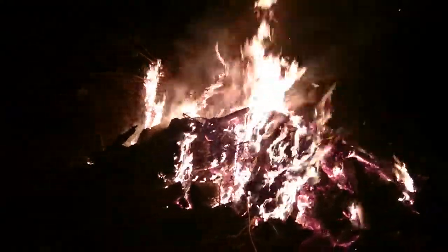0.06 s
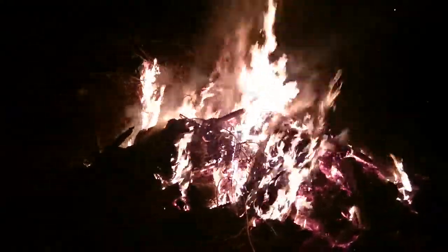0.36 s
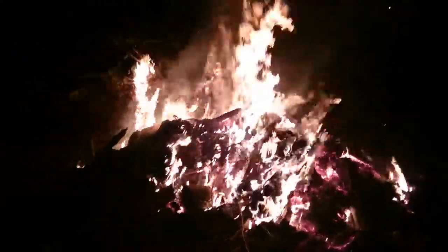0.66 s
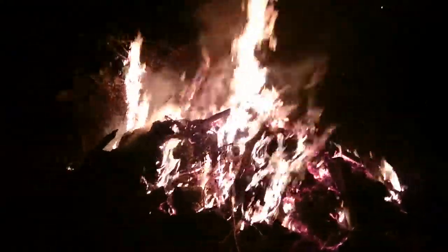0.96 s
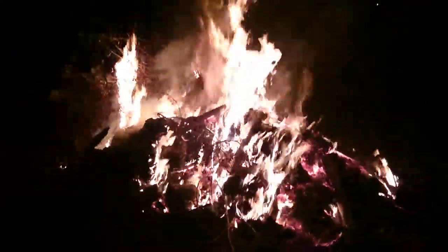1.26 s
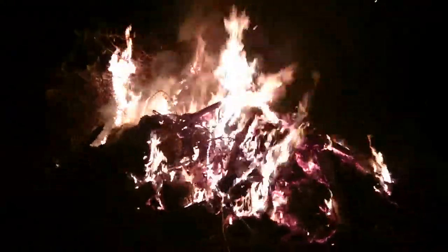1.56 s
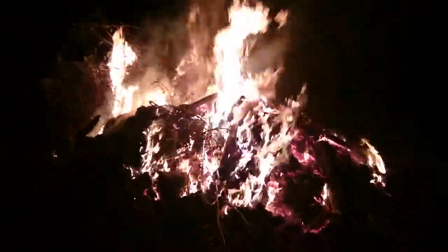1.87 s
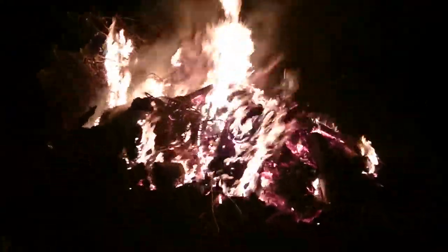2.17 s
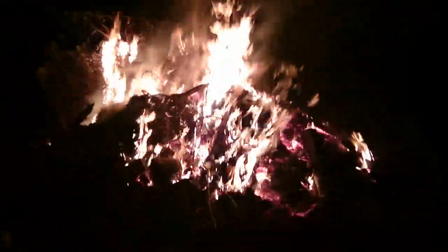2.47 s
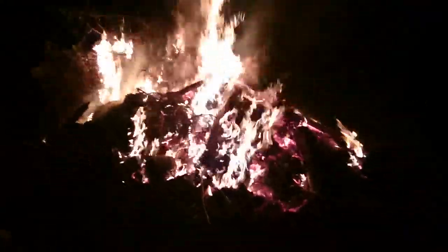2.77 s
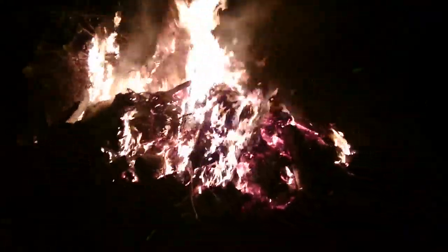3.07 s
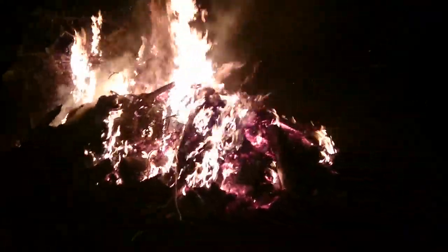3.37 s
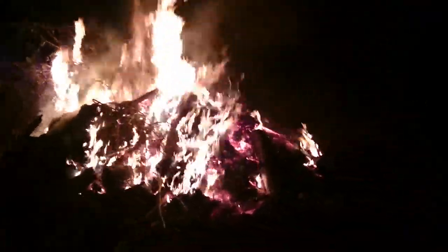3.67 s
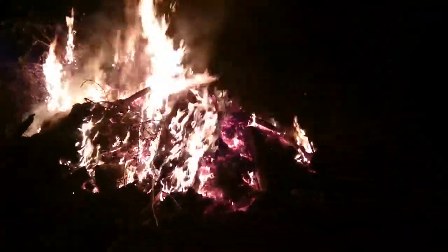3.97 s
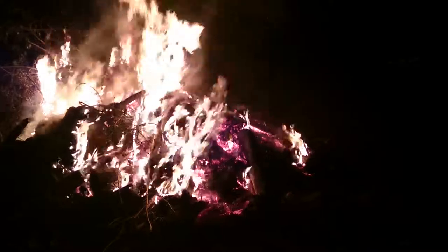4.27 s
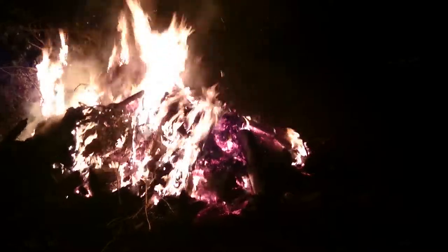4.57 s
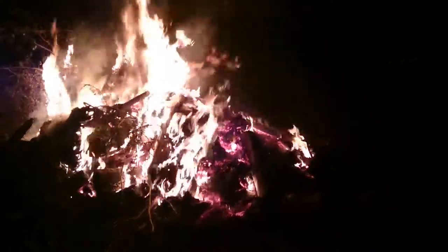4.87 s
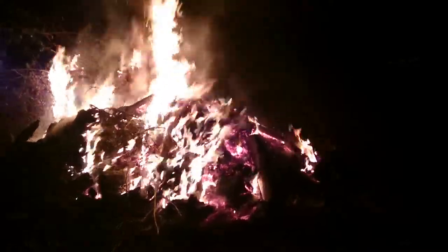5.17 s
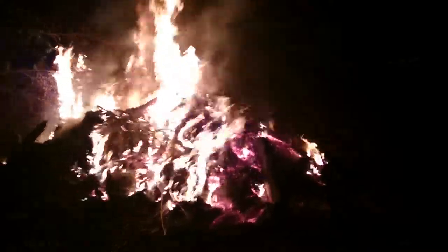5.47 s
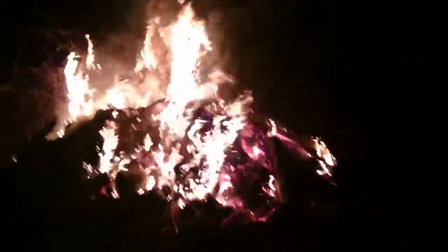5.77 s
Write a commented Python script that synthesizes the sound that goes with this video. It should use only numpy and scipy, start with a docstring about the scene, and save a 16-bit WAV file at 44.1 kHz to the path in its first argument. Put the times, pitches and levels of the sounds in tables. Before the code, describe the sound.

A large outdoor bonfire sizzles and crackles densely with sharp wood pops, over a soft flame roar and a distant engine hum.

```python
"""Sizzling and dense crackle from a large bonfire in the open, a few metres from a phone.
Sap boils, turbulent flames roar and puff, and an engine hums some way off beside a low drone.
Steam pockets burst in the wood: loud pops over countless small ones, each scattered by the pile.
Some pops, loud or faint, come with a short ring or hollow knock; steam hisses out of cracks."""
import sys
import numpy as np
from scipy import signal
from scipy.fft import rfft, irfft, next_fast_len
from scipy.io import wavfile

SR = 44100
rng = np.random.default_rng(int(sys.argv[2]) if len(sys.argv) > 2 else 0)


def transcribe(u):
    """Save the signal u as a 16-bit wav file named by the first command-line argument.

    u: samples, shape (n,) or (channels, n), limited to [-1, 1]; the rate is SR.
    q: integer samples, one column per channel.
    """
    v = np.clip(np.atleast_2d(u).T, -1, 1)
    q = np.round(v * 32767).astype(np.int16)
    wavfile.write(sys.argv[1], SR, q)


N = 256662
T = np.arange(N) / SR


def undb(db):
    """Decibels to gain."""
    return 10 ** (np.asarray(db) / 20)


def unit(x):
    """Scale to rms 1."""
    return x / np.sqrt(np.mean(x ** 2, axis=-1, keepdims=True))


def curve(table, column):
    """One table column, interpolated linearly in time."""
    rows = np.array(table)
    return np.interp(T, rows[:, 0], rows[:, column])


def bell(peak_s, sigma_s):
    """Gaussian rise and fall, peak 1."""
    return np.exp(-((T - peak_s) / sigma_s) ** 2 / 2)


def colour(spectrum, hz):
    """Gain at hz of a (freq_hz, gain_db) table."""
    rows = np.array(spectrum)
    return undb(np.interp(np.log(hz + 1), np.log(rows[:, 0]), rows[:, 1]))


def hump(hz, centre_hz, width_oct):
    """Gain of a resonance, symmetric in octaves."""
    return (1 + (np.log2((hz + 1) / centre_hz) / width_oct) ** 2 / 2) ** -1.5


def noise(gain_at):
    """Noise of rms 1 with the spectrum gain_at(hz)."""
    size = next_fast_len(N, real=True)
    white = rfft(rng.standard_normal(size))
    return unit(irfft(white * gain_at(np.fft.rfftfreq(size, 1 / SR)), size)[:N])


def band(centre_hz, width_oct):
    """Resonant noise of rms 1."""
    return noise(lambda hz: hump(hz, centre_hz, width_oct))


def walk(rate_hz):
    """Smooth random drift of rms 1."""
    return noise(lambda hz: np.exp(-(hz / rate_hz) ** 2))


def swells(rows, width_oct):
    """Noise bands that rise and die away."""
    return sum(band(centre_hz, width_oct) * undb(level_db) * bell(peak_s, sigma_s)
               for peak_s, level_db, centre_hz, sigma_s in rows)


def causal(gain):
    """Minimum-phase responses of the given gains: all ringing follows the blow."""
    cepstrum = irfft(np.log(gain))
    half = cepstrum.shape[-1] // 2
    cepstrum[:, 1:half] *= 2
    cepstrum[:, half + 1:] = 0
    return np.exp(rfft(cepstrum))


# burn intensity, drives sap and crackle: time_s, fine_db, coarse_db
BURN_LEVELS = [(0.05, -43, -49.5), (0.43, -45.5, -50.5), (0.81, -42.5, -50), (2.37, -45, -52),
               (2.54, -46, -54), (2.92, -46.5, -53.5), (3.29, -46, -55.5), (3.7, -43.5, -51.5),
               (3.84, -47, -53), (5.02, -46, -54), (5.41, -48.5, -55), (5.75, -46.5, -53.5)]
# fine sizzle: freq_hz, gain_db
SIZZLE_SPECTRUM = [(2000, -9.5), (4000, -8), (5100, 2.8), (6000, 3.2), (6900, 0.3), (8200, -0.3),
                   (9600, 4.7), (10300, -1), (13000, -4.8), (15500, -10.5)]
# coarse sputter: freq_hz, gain_db
SPUTTER_SPECTRUM = [(500, -15.5), (1000, -6.5), (1350, -5.5), (1950, 2), (2400, 1), (3200, 3.5),
                    (4200, 2.5), (7000, -26.5)]
SIZZLE_DB, SIZZLE_DB_PER_BURN_DB = -50.4, 0.55


def sap(fine_db, coarse_db):
    """Sap boils in quick fits: a fine sizzle, and a lower sputter from thick logs."""
    shared_fits = walk(80)
    fine_fits_db = 1.6 * shared_fits + 1.3 * walk(20)
    coarse_fits_db = 1.1 * shared_fits + 1.3 * walk(70)
    sizzle_db = SIZZLE_DB + SIZZLE_DB_PER_BURN_DB * (fine_db - fine_db.mean())
    sizzle = noise(lambda hz: colour(SIZZLE_SPECTRUM, hz)) * undb(sizzle_db + fine_fits_db)
    sputter = noise(lambda hz: colour(SPUTTER_SPECTRUM, hz)) * undb(coarse_db + 0.72 + coarse_fits_db)
    return sizzle + sputter


# cracking wood: freq_hz, gain_db
WOOD_SPECTRUM = [(600, -0.5), (1000, -4), (2200, 3), (3000, 3.5), (4100, 1.5), (5200, 6.5), (7200, -1.7),
                 (9400, 6.5), (11000, -.7), (15000, -3.7)]


def bursts(rows, snap_s, tail_s, scatter_s, size=1024):
    """Each burst: a snap of tearing fibres, then a tail scattered by logs and ground."""
    start_s, level_db, pitch_hz, width_oct, tail_db = np.array(rows, float).T[:, :, None]
    t, hz = np.arange(size) / SR, np.fft.rfftfreq(size, 1 / SR)
    wood = causal(hump(hz, pitch_hz, width_oct) * colour(WOOD_SPECTRUM, hz))
    white = rng.standard_normal((len(rows), 2, size))
    snap = white[:, 0] * t * np.exp(-t / snap_s)
    build_up = 1 - np.exp(-(t / scatter_s) ** 2)
    tail = white[:, 1] * np.exp(-t / tail_s) * build_up
    snap, tail = (unit(irfft(rfft(part) * wood)) for part in (snap, tail))
    gain = undb(level_db) * np.sqrt(SR / 1000 / size)  # level_db: rms if packed into 1 ms
    sounds = unit(snap + undb(tail_db) * tail) * gain
    indices = np.maximum(start_s * SR, 0).astype(int) + np.arange(size)
    return np.bincount(indices.ravel(), sounds.ravel(), N)[:N]


def small_bursts(burn_db, count, offset_db, spread_db, centre_hz, range_oct, tail_db):
    """Steam bursts at random times: most are faint, all grow with the fire."""
    when, faintness, pitch, width, depth = rng.random((count, 5)).T
    start_s = when * T[-1]
    level_db = np.interp(start_s, T, burn_db) + offset_db - spread_db * np.log(faintness + 0.1)
    pitch_hz = centre_hz * 2 ** (range_oct * (2 * pitch - 1))
    scatter_db = tail_db + 12 * depth  # deeper in the pile, more scatter
    rows = np.column_stack([start_s, level_db, pitch_hz, 0.3 + 0.7 * width, scatter_db])
    return bursts(rows, snap_s=0.00022, tail_s=0.003, scatter_s=0.0021)


def crackle(fine_db, coarse_db):
    """Twigs crackle high, logs lower; bark on the near face ticks dry and bright."""
    twigs = small_bursts(fine_db, count=1000, offset_db=0.1, spread_db=3.9,
                         centre_hz=8000, range_oct=0.85, tail_db=-2)
    logs = small_bursts(coarse_db, count=320, offset_db=4.5, spread_db=2.0,
                        centre_hz=2700, range_oct=1.0, tail_db=-7.5)
    bark = small_bursts(fine_db, count=110, offset_db=8.7, spread_db=0.6,
                        centre_hz=7400, range_oct=0.77, tail_db=-19.5)
    return twigs + logs + bark


# flame rumble before its low-pass: freq_hz, gain_db
RUMBLE_SPECTRUM = [(20, -5.5), (38, 0), (80, 1), (130, -2.5), (200, -5), (330, -10), (450, -18.5),
                   (650, -22), (1000, -16), (2000, -21)]
# fluttering eddies: centre_hz, gain_db
EDDY_BANDS = [(290, -7), (460, -7.5), (950, -5)]
# flame surges and one dip: peak_s, change_db, sigma_s
FLAME_SURGES = [(0.252, 4.6, 0.43), (1.288, 4.5, 0.11), (1.79, -3, 0.033), (2.02, 4.5, 0.088),
                (3.22, 2, .13), (3.864, 3, 0.4), (5.503, 3.5, 0.68)]
ROAR_BASE_DB, RUMBLE_CUTOFF_HZ, FLUTTER_DB, FLUTTER_HZ = -61.5, 260, 2.8, 16


def roar():
    """Turbulent gas rumbles and flutters, each eddy size on its own."""
    rumble = noise(lambda hz: colour(RUMBLE_SPECTRUM, hz) / (1 + (hz / RUMBLE_CUTOFF_HZ) ** 2))
    rumble *= undb(3.7 + 2.2 * walk(5))
    eddies = sum(band(centre_hz, width_oct=0.43) * undb(gain_db + FLUTTER_DB * walk(FLUTTER_HZ))
                 for centre_hz, gain_db in EDDY_BANDS)
    surge_db = sum(change_db * bell(peak_s, sigma_s) for peak_s, change_db, sigma_s in FLAME_SURGES)
    return (rumble + eddies) * undb(ROAR_BASE_DB + surge_db)


# harmonics of the firing rate: order, relative_db
ENGINE_HARMONICS = [(1, 2.5), (2, -18), (3, -29.5), (4, -31.5)]
LOADED_HZ, LOADED_DB, UNLOADED_EXTRA_HZ, UNLOADED_EXTRA_DB = 55.75, -43, 1.7, 1.3
LOAD_AT_S, LOAD_RAMP_S = 1.6, 0.12
HUNT_SWING_HZ, HUNT_PERIOD_S, HUNT_CREST_S = 0.62, 0.475, 1.96


def engine():
    """A far engine slows and softens as it takes up load; its governor hunts. Only low orders carry."""
    unloaded = (1 - np.tanh((T - LOAD_AT_S) / LOAD_RAMP_S)) / 2
    hunt = np.cos(2 * np.pi * (T - HUNT_CREST_S) / HUNT_PERIOD_S)
    firing_hz = LOADED_HZ + UNLOADED_EXTRA_HZ * unloaded + HUNT_SWING_HZ * hunt + 0.21 * walk(3.6)
    phase = 2 * np.pi * np.cumsum(firing_hz) / SR
    hum = 0
    for order, relative_db in ENGINE_HARMONICS:
        waver = 0.065 + 0.33 * min(order - 1, 2)  # upper orders waver more in the air
        drift_rad = waver * walk(4.8) + 0.06 * walk(22) + 2 * np.pi * rng.random()
        gain = undb(relative_db) * (1 + waver * walk(10))
        hum += gain * np.sin(order * phase + drift_rad)
    return unit(hum) * undb(LOADED_DB + UNLOADED_EXTRA_DB * unloaded)


# lower drone band: time_s, level_db
DRONE_LEVELS = [(0, -67), (3, -69.5), (4.2, -62), (5.1, -56), (5.82, -58.5)]


def drone():
    """A low drone swells late; a fainter band wavers above it."""
    lower = band(centre_hz=159.2, width_oct=0.087) * undb(curve(DRONE_LEVELS, column=1))
    upper = band(centre_hz=336, width_oct=0.05) * undb(-71.5 + 3.8 * walk(3))
    return lower + upper


# large steam pockets: start_s, level_db, pitch_hz, tail_db
STEAM_POPS = [(0.1334, -29, 9100, -2), (.1628, -27, 8000, 0), (0.2624, -27, 5160, -9),
              (.2825, -29.5, 7500, -12), (0.2902, -26.5, 8500, -24), (.37, -29, 7000, 7),
              (0.405, -31, 7800, -12), (.4285, -19.5, 8360, -12), (.4483, -30, 7500, -14),
              (.4556, -27.5, 7700, -19), (.4974, -27, 6550, -2), (0.525, -18, 9150, 1),
              (0.5698, -22.5, 7800, 11), (.6375, -24.5, 6660, -10), (0.656, -24.5, 6000, -3),
              (.662, -18.5, 10800, -5), (.718, -28, 6800, -4), (.7287, -29, 8000, -12),
              (.747, -26, 8600, 10), (0.7787, -14.5, 9900, -16), (0.8347, -15.5, 8360, -13),
              (0.847, -25, 7000, -3), (0.8493, -25, 8600, -15), (.8748, -28, 7500, -6),
              (0.904, -22.5, 5600, -20), (.928, -28.5, 7500, -10), (0.9883, -28.5, 8300, -14),
              (1.1071, -29, 7500, -12), (1.1337, -28.5, 8300, -2), (1.1955, -28, 8600, -9),
              (1.2318, -27, 9200, -7), (1.263, -19, 6460, -3), (1.2965, -24.5, 5000, -9),
              (1.3464, -23.5, 5400, -9), (1.3857, -16, 8000, -8), (1.4431, -24, 8400, -4),
              (1.4503, -27, 8300, -10), (1.4594, -23.5, 5500, -17), (1.5363, -30, 6500, -12),
              (1.55, -24, 5300, -22), (1.6691, -28, 8150, 0), (1.6845, -28, 7800, -3),
              (1.731, -25, 6100, -1), (1.7545, -28, 8400, -8), (1.7655, -24, 6530, -9),
              (1.7858, -22, 8200, 3), (1.8712, -29, 8500, -16), (1.8842, -27, 6800, -5),
              (1.9131, -29.5, 7000, -12), (2.0367, -29, 7500, -14), (2.0417, -27, 9000, -8),
              (2.0492, -28, 5800, -10), (2.0698, -21, 8800, -9), (2.1392, -29.5, 7700, -2),
              (2.1602, -24.5, 4800, -22), (2.1992, -29, 5900, -14), (2.208, -25.5, 7170, -8),
              (2.2143, -29, 8300, -15), (2.4025, -20.5, 7400, 4), (2.485, -28, 9200, -2),
              (2.5473, -29.5, 9000, -12), (2.561, -24, 3700, -16), (2.6869, -26, 6160, -6),
              (2.7034, -26.5, 7940, -3), (3.0267, -13, 11200, -18), (3.052, -23, 7500, -4),
              (3.0645, -14.5, 8600, -11), (3.122, -28, 6400, -15), (3.2009, -29, 7500, -16),
              (3.228, -27.5, 5400, 1), (3.297, -21.5, 7240, 18), (3.4483, -26, 7600, -25),
              (3.5193, -15.5, 5340, -14), (3.5211, -18, 5500, -10), (3.595, -26, 6450, -18),
              (3.6656, -27.5, 10500, -20), (3.716, -20.5, 7640, -14), (3.807, -23, 7800, -12),
              (3.829, -24.5, 8360, 5), (3.938, -31, 7460, 5), (4.0009, -26.5, 3570, -5),
              (4.0418, -27.5, 4200, -8), (4.2039, -22, 6700, -21), (4.3172, -30.5, 5260, -15),
              (4.3915, -28, 5600, -14), (4.4037, -30, 8000, -14), (4.4957, -24, 8100, -8),
              (4.544, -18.5, 7000, 5), (4.6204, -27, 6000, -17), (4.6295, -22.5, 6640, 0),
              (4.6723, -27, 5500, 5), (4.698, -31, 3600, -8), (4.8583, -30.5, 6500, -2),
              (4.9097, -24, 5200, -24), (4.9127, -25.5, 7100, -3), (4.9584, -23.5, 5200, -10),
              (5.0088, -24, 9500, -12), (5.0833, -27.5, 7100, -5), (5.1085, -31, 8000, -10),
              (5.13, -26.5, 5600, -1), (5.2212, -31, 6700, -8), (5.26, -25, 10500, -14),
              (5.3244, -27.5, 4060, -15), (5.4336, -29.5, 8850, -11), (5.606, -23, 10800, -16),
              (5.768, -24.5, 6000, 8), (5.8104, -28, 5300, -1)]
ONE_OCTAVE_WIDE_AT_HZ = 5000  # near-equal width in Hz, so high pops sound more pitched
FIBRE_DB, SPLINTER_DB, SPLINTER_MEAN_DELAY_S = -25, -18, 0.016


def pops():
    """Large steam pockets split the wood: fibres give way just before, splinters tick after."""
    pockets = [(start_s, level_db, pitch_hz, ONE_OCTAVE_WIDE_AT_HZ / pitch_hz, tail_db)
               for start_s, level_db, pitch_hz, tail_db in STEAM_POPS]
    leads_s = 0.0018 + 0.0064 * rng.random(len(pockets))
    fibres, splinters = [], []
    for (start_s, level_db, pitch_hz, width_oct, _), lead_s in zip(pockets, leads_s):
        fibres.append((start_s - lead_s, level_db + FIBRE_DB, pitch_hz, width_oct, 0))
        for delay_s in rng.exponential(SPLINTER_MEAN_DELAY_S, size=3):
            splinters.append((start_s + delay_s, level_db + SPLINTER_DB, pitch_hz, width_oct, -6))
    return bursts(pockets + fibres + splinters, snap_s=0.00026, tail_s=0.0039, scatter_s=0.0015)


# short flame puffs and one slow low swell: peak_s, level_db, centre_hz, sigma_s
PUFFS_AND_SWELL = [(.39, -58.5, 370, 0.039), (1.98, -52, 480, 0.0069), (3.27, -57, 379, 0.022),
                   (3.582, -46, 1800, 0.0097), (1.27, -61, 480, .04), (4.066, -50, 427, 0.011),
                   (5.35, -61.5, 210, .4), (5.555, -44.5, 85.4, 0.02)]


def puffs_and_swell():
    """Short puffs of flame, and one slow low swell near 210 Hz with the drone."""
    return swells(PUFFS_AND_SWELL, width_oct=0.43)


# log resonances: start_s, level_db, pitch_hz, width_oct
LOG_MODES = [(0.524, -26, 3430, .095), (.5237, -30, 2320, 0.37), (0.5243, -16.5, 8340, 0.053),
             (0.835, -31, 5800, 0.046), (1.385, -20.5, 5640, 0.11), (1.3853, -28, 2800, .16),
             (2.5612, -36, 1970, 0.12), (2.561, -31, 2920, 0.092), (3.0638, -17, 3470, 0.065),
             (3.0638, -26, 2800, 0.087), (3.0646, -19, 5200, 0.34), (3.0646, -15.5, 7400, 0.076),
             (3.0646, -30, 1490, 1), (3.0646, -34, 570, 0.92), (3.2275, -29, 1450, 0.3),
             (3.5186, -17, 2830, 0.077), (3.5185, -20, 3430, 0.07), (3.5204, -20.5, 4400, 0.09),
             (3.5203, -19, 6540, 0.065), (3.52, -35, 970, 0.23), (3.807, -22.5, 9250, .035),
             (4.5434, -19, 5100, 0.099), (4.5424, -21, 6350, 0.069), (4.542, -27.5, 1910, 0.25),
             (4.542, -31, 1200, 0.32), (4.699, -35, 1700, 0.92), (5.26, -23, 7400, .15),
             (5.606, -28, 5600, .14)]


def log_rings(tail_db=-6):
    """Some pops, loud or faint, come with a short ring or hollow knock from their log."""
    rows = [(*mode, tail_db) for mode in LOG_MODES]
    return bursts(rows, snap_s=0.00012, tail_s=0.0022, scatter_s=0.0008)


# escaping steam: peak_s, level_db, centre_hz, sigma_s
STEAM_JETS = [(0.85, -56, 3300, 0.5), (1.74, -47.5, 9500, 0.051), (1.8, -54, 3380, 0.22),
              (3.8, -54.5, 5800, 0.38), (4.85, -57.5, 5500, 0.36)]


def steam_jets():
    """Steam escapes from cracks in the wood with a narrow hiss."""
    return swells(STEAM_JETS, width_oct=0.14)


def scene():
    """The fire and the far engine in open air, mono."""
    fine_db, coarse_db = curve(BURN_LEVELS, column=1), curve(BURN_LEVELS, column=2)
    wood = sap(fine_db, coarse_db) + crackle(fine_db, coarse_db) + steam_jets() + pops() + log_rings()
    return (wood + roar() + puffs_and_swell() + engine() + drone())[None]


CUTOFF_HZ = 15500


def record(dry):
    """The phone cuts the top with a steep low-pass."""
    return signal.sosfilt(signal.ellip(8, 0.2, 70, CUTOFF_HZ, fs=SR, output="sos"), dry)


dry = scene()
out = record(dry)
transcribe(out)
```